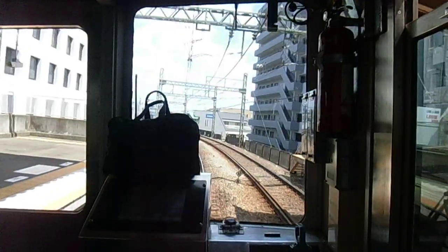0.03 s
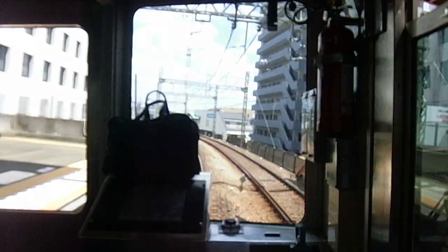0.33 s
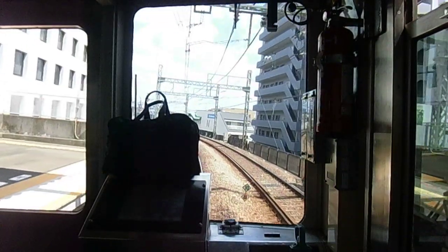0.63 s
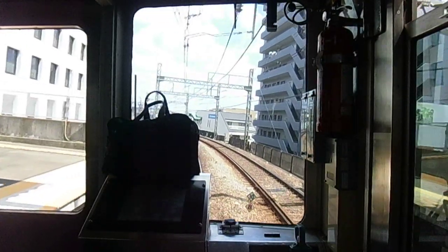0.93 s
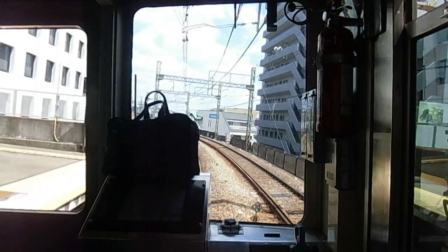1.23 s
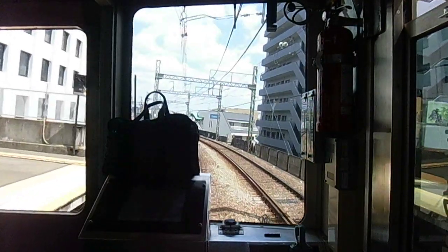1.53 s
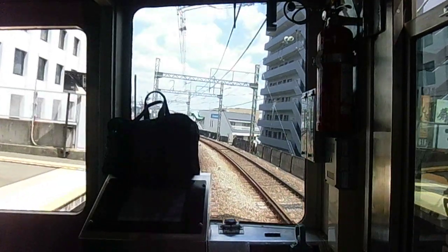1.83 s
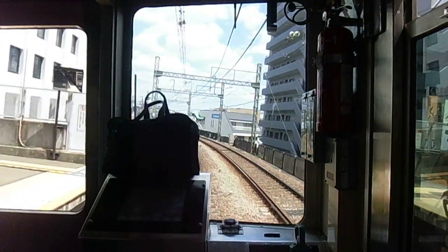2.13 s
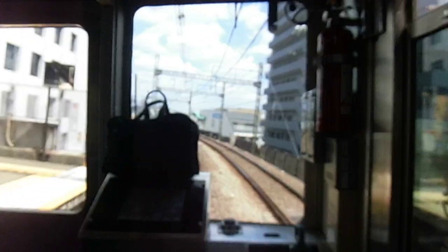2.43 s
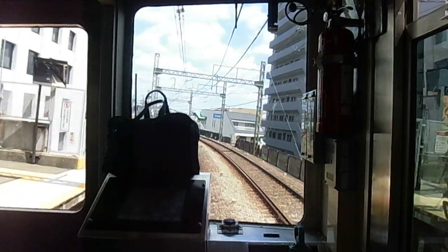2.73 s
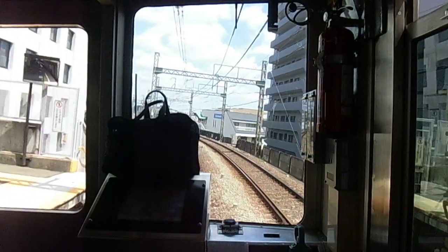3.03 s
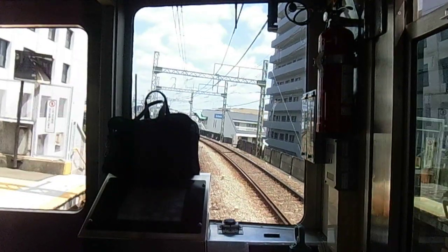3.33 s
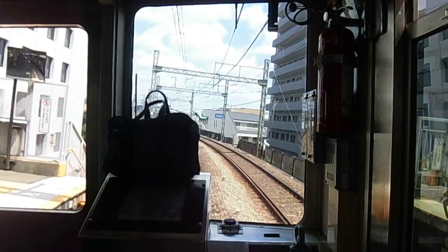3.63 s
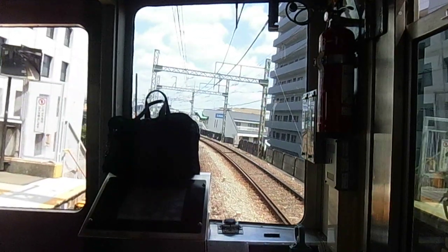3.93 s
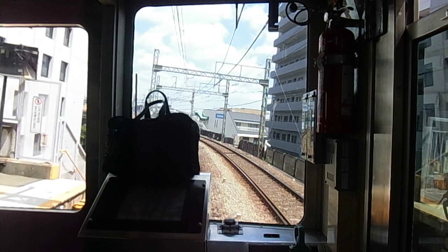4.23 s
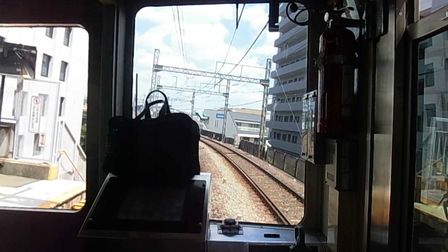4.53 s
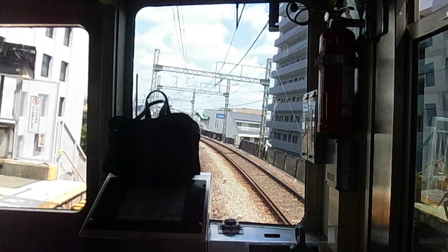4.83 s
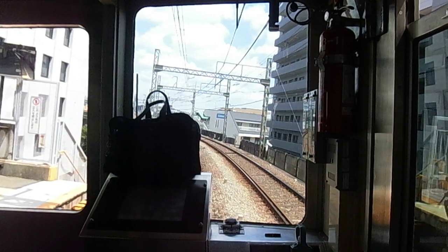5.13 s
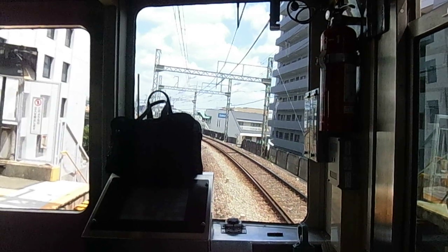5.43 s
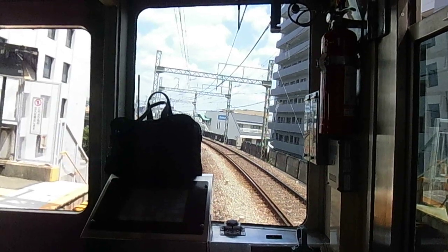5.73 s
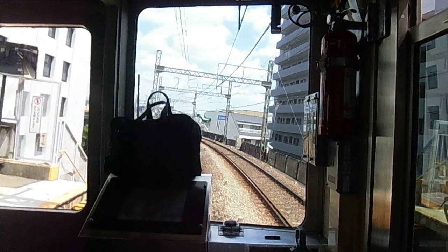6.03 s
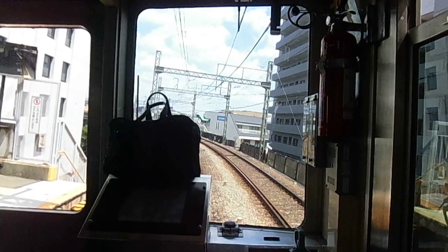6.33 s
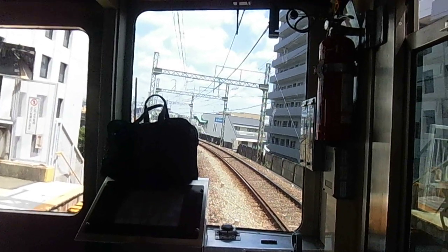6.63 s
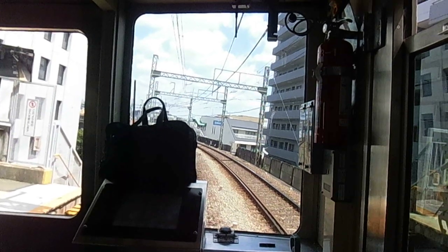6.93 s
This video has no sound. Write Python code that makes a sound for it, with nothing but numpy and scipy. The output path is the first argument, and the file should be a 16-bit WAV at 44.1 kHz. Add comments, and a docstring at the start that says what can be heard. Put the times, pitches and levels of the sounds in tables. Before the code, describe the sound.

Inside the cab of an electric train rolling slowly along a platform, a low rumble sits under steady ventilation and a wavering fan whine. Early on, the car body thumps, loose fittings clack and the brakes groan briefly. The rumble eases as the train creeps. Near the end, a valve releases compressed air in a sharp, loud blast that settles into a hiss with short whistles.

```python
"""A low rumble, steady ventilation and beating fan tones fill the cab of an electric train
as it rolls slowly along a platform and comes to a stop. The car body jolts on its springs a few times,
loose fittings clack and the brake shoes groan briefly. Then a valve vents compressed air:
a sharp blast with a sinking roar that settles into a hiss in the exhaust pipe and whistles."""
import sys
import numpy as np
from scipy import signal
from scipy.fft import rfft, irfft, next_fast_len
from scipy.io import wavfile

SR = 44100
rng = np.random.default_rng(int(sys.argv[2]) if len(sys.argv) > 2 else 0)


def wrap_up_sound(samples):
    """Save the sound to the file named by the first command line argument, as 16-bit audio."""
    columns = np.atleast_2d(samples).T
    # keep every value between -1 and 1, then stretch to whole-number steps
    tamed = np.clip(columns, -1, 1)
    steps = np.round(tamed * 32767).astype(np.int16)
    wavfile.write(sys.argv[1], SR, steps)


N = 307377
FFT_SIZE = next_fast_len(N, True)
TIME = np.arange(N) / SR
FREQS = np.maximum(np.fft.rfftfreq(FFT_SIZE, 1 / SR), 1)


def from_db(db):
    return 10 ** (np.asarray(db) / 20)

def rms_one(x):
    return x / np.sqrt(np.mean(x ** 2) + 1e-20)

def colour(points):
    """An EQ curve through the points, rolling off 20 dB per octave beyond its ends."""
    hz, db = np.transpose(points)
    octaves_outside = np.abs(np.log2(FREQS / np.clip(FREQS, hz[0], hz[-1])))
    return from_db(np.interp(np.log(FREQS), np.log(hz), db) - 20 * octaves_outside)

def bell(hz, width_hz):
    """One resonance, gain 1 on top."""
    return 1 / (1 + ((FREQS - hz) / (.75 * width_hz)) ** 2)

def peaks(resonances):
    """An EQ curve that boosts each resonance of a cavity or panel."""
    return from_db(sum(db * bell(hz, width) for hz, width, db in resonances))

def noise(eq):
    """Noise through an EQ curve; rms 1."""
    return rms_one(irfft(rfft(rng.standard_normal(FFT_SIZE)) * eq, FFT_SIZE)[:N])

def drift(rate_hz):
    """Smooth random modulation; rms 1."""
    return noise(1 / (1 + (FREQS / rate_hz) ** 4))

def tone(hz, wander_hz):
    """A sine of rms 1 whose pitch wanders."""
    cycles = np.cumsum(hz + wander_hz * drift(2.975)) / SR
    return np.sqrt(2) * np.sin(2 * np.pi * (cycles + rng.random()))

def decay(start, t60):
    """Nothing before the start, then an exponential fall from 1."""
    age = TIME - start
    return (age >= 0) * from_db(-60 * np.clip(age / t60, 0, 3))

def envelope(start, attack_s, hold_s, fade_db_per_s):
    """A straight rise to 1, a hold, then a steady fall in dB."""
    age = TIME - start
    return np.clip(age / attack_s, 0, 1) * from_db(-fade_db_per_s * np.maximum(age - attack_s - hold_s, 0))


# EQ of the body's sub rumble and of the wheel drone: f/Hz, level/dB
SWAY_EQ = [(6, -11), (12, -5.5), (28, 0), (50, -4.5), (66, -11.5), (95, -21.5), (160, -54)]
DRONE_EQ = [(45, -0.5), (78, 2.5), (108, -3.5), (150, -7.5), (180, -3.5), (205, -6.5), (230, -6.5),
            (265, -14), (360, -18), (800, -28)]
# floor panels ringing under the drone: f/Hz, width/Hz, boost/dB
FLOOR_MODES = [(114.8, 9.4, 6), (175, 11, 2), (229.5, 9, 4)]
CREEP_FROM_S = 3.8

def running_gear():
    """Sway, drone and gear hum sink with the speed until the train only creeps; jolts ride on top."""
    time_to_creep = np.maximum(CREEP_FROM_S - TIME, 0)
    thumps, stir = jolts()
    sway = np.hypot(from_db(-32.5 + 1.45 * time_to_creep), stir)
    drone = np.hypot(from_db(-34.5 + 0.54 * time_to_creep), from_db(-14.5) * stir)
    gear_hum = from_db(-47 + 1.75 * time_to_creep + 3.5 * drift(3.0)) * tone(112.7, wander_hz=1.44)
    rumble = sway * noise(colour(SWAY_EQ)) + drone * noise(colour(DRONE_EQ) * peaks(FLOOR_MODES))
    return thumps + rumble + gear_hum


# EQ of the rush in the ducts and of the airy top at the grilles: f/Hz, level/dB
DUCT_EQ = [(100, 0.5), (270, -1.5), (360, -2), (450, 1.5), (600, -2), (750, 0), (900, -2.5), (1050, -4.5),
           (1350, -5), (1650, -12), (2100, -9), (3100, -16), (5800, -30), (16000, -63)]
GRILLE_EQ = [(2500, 3), (5000, 0.5), (6500, 0), (8500, 1.5), (11000, -4.5), (16000, -6)]
# duct resonances: f/Hz, width/Hz, boost/dB
DUCT_MODES = [(300.4, 8.9, 7.5), (498, 8.4, 7.5), (535, 17, 5.5), (580, 9, 2.5), (680, 39, 5)]
# fan tones and electrical hum: f/Hz, level/dB, wander/Hz
HUM_TONES = [(120.2, -52, 0.29), (227.3, -49.5, 1.53), (439.6, -56, 0.88)]

def ventilation():
    """A steady bed of air in the ducts and grilles, over fan and electrical hum."""
    ducts = from_db(-38) * noise(colour(DUCT_EQ) * peaks(DUCT_MODES))
    grilles = from_db(-60.5 + 0.4 * (drift(3.1) + drift(9.7))) * noise(colour(GRILLE_EQ))
    hum = sum(from_db(db) * tone(hz, wander) for hz, db, wander in HUM_TONES)
    return ducts + grilles + hum


# pitch of the lead blower, creeping up: t/s, f/Hz
LEAD_PITCH = [(0, 702.4), (1.5, 703.2), (3.4, 702.4), (4.4, 704.6), (5.8, 705.6), (6.97, 705.6)]
# the three blowers: detune from the lead/Hz, relative level/dB, wander/Hz
BLOWER_VOICES = [(0, -2.7, .35), (-9.5, -12.5, 0.78), (-16.8, -12, 0.47)]
# fader on their combined whine: t/s, level/dB
WHINE_FADER = [(0, -41.5), (.6, -39), (1.5, -40), (2.1, -40.5), (2.55, -45.5), (2.9, -39), (3.4, -42),
               (4.3, -37), (5.8, -38), (6.97, -42)]

def blowers():
    """Three blowers at nearly the same speed beat against each other in a wavering whine."""
    lead_hz = np.interp(TIME, *np.transpose(LEAD_PITCH))
    whine = sum(from_db(db) * tone(lead_hz + detune, wander) for detune, db, wander in BLOWER_VOICES)
    fader_db = np.interp(TIME, *np.transpose(WHINE_FADER))
    return from_db(fader_db + 1.5 * drift(6.8)) * whine


# thumps of the car body: t/s, level/dB, f/Hz, t60/s, stirred rumble/dB
BODY_JOLTS = [(0.464, -8, 32.2, 0.25, -22.5), (0.595, -22, 60, .3, -27), (1.058, -14, 31, 0.37, -21.5),
              (1.16, -21, 84.3, 0.38, -36), (2.586, -15, 45, 0.27, -36), (6.559, -16, 70, .1, -34),
              (6.785, -14.5, 35, 0.28, -30)]

def jolts():
    """The body swings on its springs: returns the thumps and the envelope of the rumble they stir up."""
    thumps, stir = np.zeros(N), np.zeros(N)
    for start, db, hz, t60, stir_db in BODY_JOLTS:
        thumps += from_db(db) * decay(start, t60) * np.sin(2 * np.pi * hz * (TIME - start))
        swell = envelope(start, attack_s=0.027, hold_s=0.071, fade_db_per_s=19.5)
        stir = np.hypot(stir, from_db(stir_db) * swell)
    return thumps, stir


# resonances of the cab fittings: f/Hz, width/Hz, level/dB
FITTING_MODES = [(433, 130, 10.5), (1300, 1600, -1), (3160, 4000, 6), (7600, 1000, -1.5), (8900, 3100, -2),
                 (13500, 5400, -3)]
# clacks: t/s, level/dB, t60/s, treble tilt/(dB per octave), metallic chink boost/dB
FITTING_HITS = [(.471, -34.5, 0.094, -3, -3), (0.478, -32, 0.093, -4.5, -4), (0.483, -30, 0.096, -5.5, 0),
                (0.501, -31, 0.065, -6.5, 0), (0.527, -28, 0.058, -9, 0), (.535, -39, .37, -5.5, -3),
                (1.219, -47, 0.15, -2, 6), (1.243, -54.5, 0.11, 1, 14), (1.44, -29.5, .15, -9.5, 0),
                (5.456, -42.5, 0.026, 0.5, 3), (6.115, -54, 0.24, -1, 0)]

def knocks():
    """Loose fittings clack: each contact is a burst that dies in their broad resonances."""
    body = sum(from_db(db) * bell(hz, width) for hz, width, db in FITTING_MODES)
    octave = np.log2(np.maximum(FREQS, 500))  # the tilt starts at 500 Hz
    chink = bell(7200, width_hz=600)
    out = np.zeros(N)
    for start, db, t60, tilt, chink_db in FITTING_HITS:
        out += from_db(db) * decay(start, t60) * noise(body * from_db(tilt * octave + chink_db * chink))
    return out


# groans of the brake shoes: t/s, length/s, first f/Hz, last f/Hz, level/dB
BRAKE_GROANS = [(1.139, 0.24, 550, 494, -39), (1.31, 0.23, 505, 523, -36.5), (1.457, 0.19, 551, 545, -40.5),
                (1.64, 0.13, 490, 510, -41.5), (1.75, 0.16, 512, 513, -38), (1.925, .12, 511, 560, -37)]

def brakes():
    """Each grip of the shoes is a rough groan that swells, glides and lets go."""
    out = np.zeros(N)
    for start, length, first_hz, last_hz, db in BRAKE_GROANS:
        progress = np.clip((TIME - start) / length, 0, 1)
        glide_hz = first_hz + (last_hz - first_hz) * progress
        out += from_db(db) * np.sin(np.pi * progress) * tone(glide_hz, wander_hz=1.46)
    roughness = 1 + 0.37 * drift(34.0)
    return out * roughness


# EQ of the opening blast and of the lasting hiss: f/Hz, level/dB
BLAST_EQ = [(150, -9), (400, -0.5), (750, 1), (1200, 6), (1600, -3), (2600, 3), (3700, -1), (4600, -1.5),
            (6000, -5.5), (9000, -3.5), (12000, -9), (16000, -20)]
HISS_EQ = [(400, 0), (900, -6), (1550, -1), (2800, 2.5), (3400, 2), (3800, -2.5), (4200, 1.5), (4700, 0.5),
           (6100, -5), (8200, -4), (9800, -2), (10500, -15.5), (13000, -11), (16000, -11)]
# exhaust pipe resonances, then its overtones in the blast and in the hiss: f/Hz, width/Hz, boost/dB
PIPE_MODES = [(2900, 250, -0.5), (4230, 100, 1), (4580, 110, 0.5), (5640, 150, 3.5), (7060, 790, 10),
              (9240, 400, 3), (11550, 900, 11.5)]
BLAST_OVERTONES = [(1862, 30, 9), (2062, 50, 4), (2480, 16, 7), (2790, 18, 10), (3150, 16, 8),
                   (4250, 160, 3), (6600, 700, 4), (11550, 1000, 4.5)]
HISS_OVERTONES = [(1862, 30, 7), (2060, 70, 8), (2480, 16, 5), (2875, 16, 4), (4638, 16, 5), (5103, 20, 5),
                  (5562, 12, 7), (6323, 12, 9), (6370, 12, 8), (6826, 16, 4), (6987, 16, 4), (9243, 12, 5)]
VALVE_S = 6.217

def air_release():
    """The valve opens: a broad, fluttering blast fades with the pressure, leaving the pipe's hiss."""
    age = TIME - VALVE_S
    blast_gain = from_db(-30) * envelope(VALVE_S, attack_s=0.023, hold_s=0.13, fade_db_per_s=38)
    settled = 1 - np.exp(-np.maximum(age - 0.2, 0) / 0.31)  # the hiss eases off after 0.2 s
    hiss_gain = np.clip(age / 0.017, 0, 1) * from_db(-31.5 - 3.5 * settled)
    room = cab_eq(t60=0.28, wet_db=-8.5)
    blast = blast_gain * noise(colour(BLAST_EQ) * peaks(BLAST_OVERTONES) * room)
    hiss = hiss_gain * noise(colour(HISS_EQ) * peaks(PIPE_MODES) * peaks(HISS_OVERTONES) * room)
    flutter = from_db(0.28 * drift(40.0))
    return (blast + hiss) * flutter

def cab_eq(t60, wet_db):
    """Direct sound plus dense reflections off glass and steel, as a finely rippled EQ curve."""
    echoes = rng.standard_normal(N) * decay(0.0025, t60)
    response = from_db(wet_db) * echoes / np.linalg.norm(echoes)
    return np.abs(1 + rfft(response, FFT_SIZE))


def roar(start_hz=1390, sink_octaves_per_s=4.2, width_hz=120):
    """The jet's roar: a band of turbulence that sweeps down as the pressure falls."""
    hz = start_hz * 2 ** (-sink_octaves_per_s * np.maximum(TIME - VALVE_S, 0))
    phase = 2 * np.pi * np.cumsum(hz) / SR
    band = rms_one(drift(width_hz) * np.sin(phase) + drift(width_hz) * np.cos(phase))
    return from_db(-38) * envelope(VALVE_S, attack_s=0.22, hold_s=0.081, fade_db_per_s=50) * band


# valve whistles, the last one lower as the pressure falls:
# t/s, f/Hz, level/dB, attack/s, hold/s, fade/(dB per s), roughness/(0-1)
WHISTLE_NOTES = [(6.25, 2599, -50, .02, .03, 60, .3), (6.568, 2599, -37.6, .03, .09, 57, .04),
                 (6.84, 2060, -42.3, .02, .06, 35, .5)]

def whistles():
    """The jet locks briefly onto a resonance of the valve; turbulence roughens the weaker notes."""
    out = np.zeros(N)
    for start, hz, db, attack, hold, fade, rough in WHISTLE_NOTES:
        pure = tone(hz, wander_hz=1.22)
        breathy = drift(35) * tone(hz, wander_hz=12.0)
        note = rms_one((1 - rough) * pure + rough * breathy)
        out += from_db(db) * envelope(start, attack, hold, fade) * note
    return out


# EQ of the low end under the blast: f/Hz, level/dB
BUFFET_EQ = [(30, -9), (70, 4), (130, -5), (220, -11), (380, -18), (900, -24.5)]

def buffeting():
    """The escaping air buffets the cab just after the valve opens."""
    swell = envelope(VALVE_S + 0.041, attack_s=0.15, hold_s=0.18, fade_db_per_s=29)
    return from_db(-23.5) * swell * noise(colour(BUFFET_EQ))


def scene():
    """The mono mix: the cab's bed, clacks and groans, then the venting air."""
    bed = running_gear() + ventilation() + blowers()
    return (bed + knocks() + brakes() + air_release() + roar() + whistles() + buffeting())[None]

def record(dry):
    """A steep high cut at 15.8 kHz."""
    return signal.sosfilt(signal.ellip(12, .1, 90, 15800, fs=SR, output="sos"), dry)


dry = scene()
out = record(dry)
wrap_up_sound(out)
```